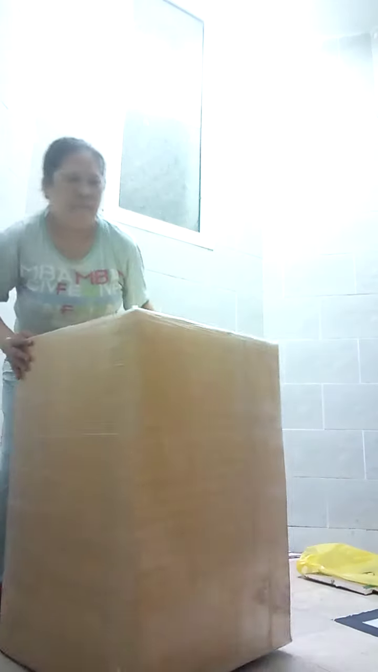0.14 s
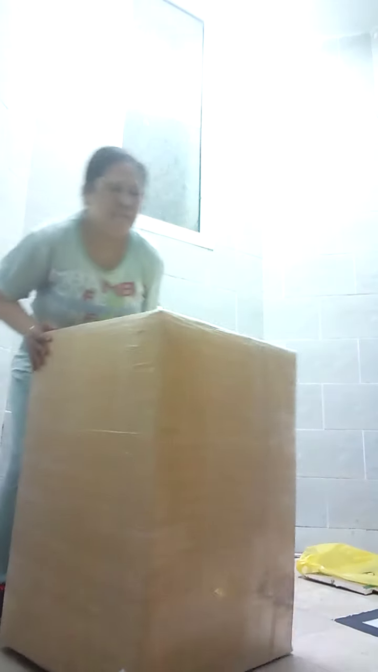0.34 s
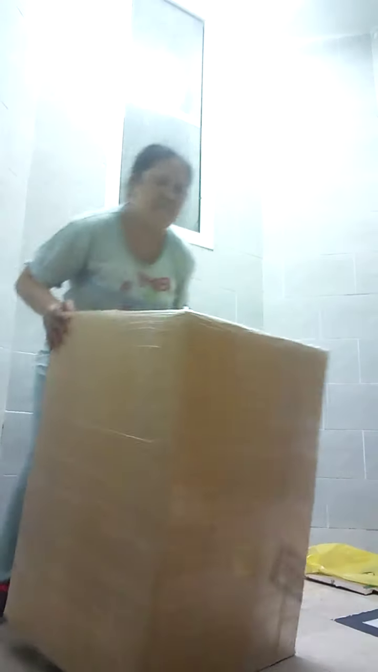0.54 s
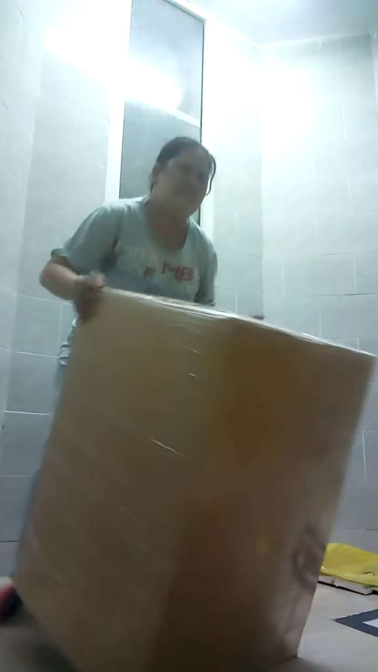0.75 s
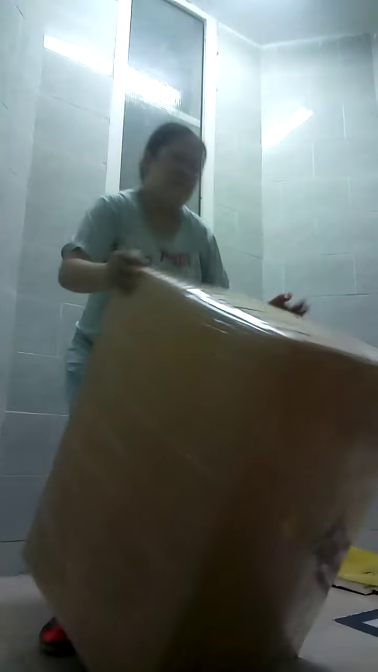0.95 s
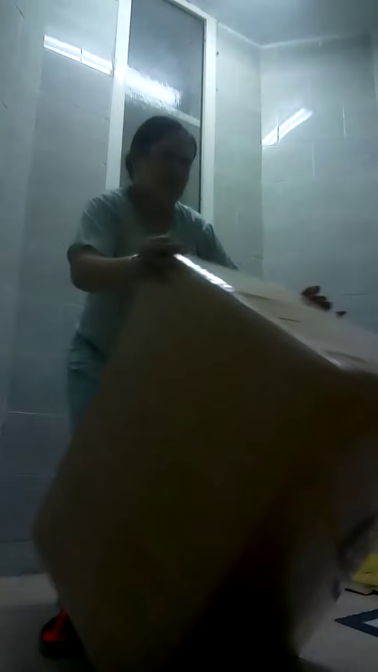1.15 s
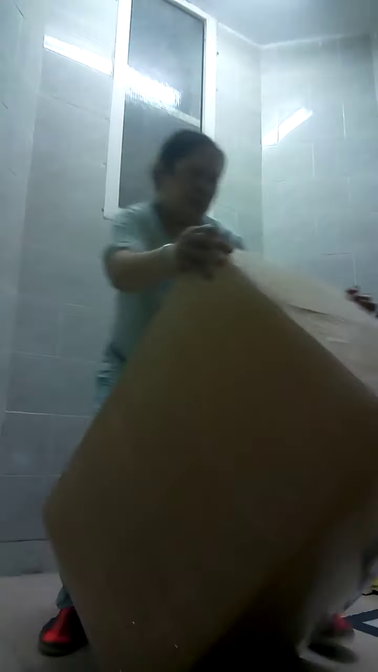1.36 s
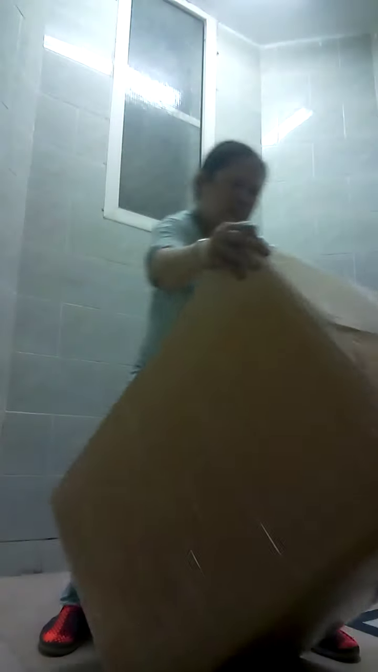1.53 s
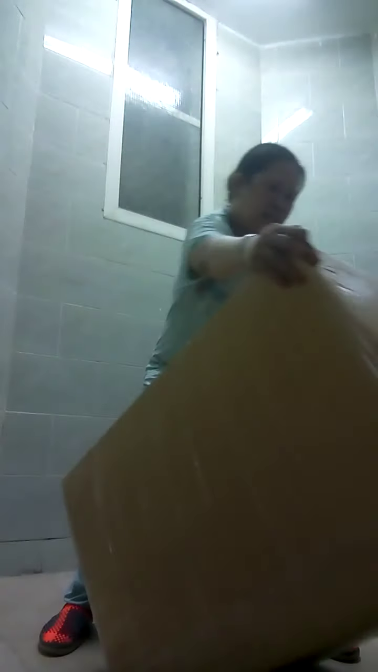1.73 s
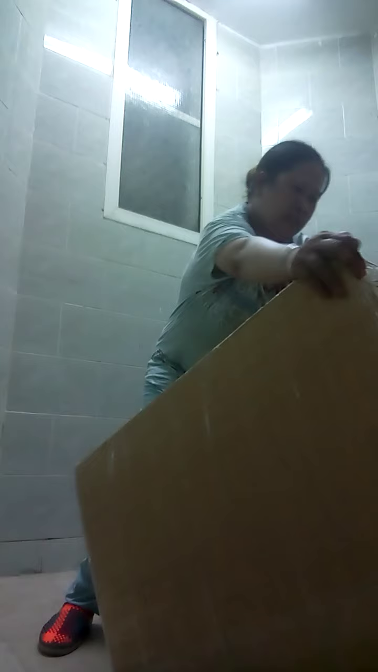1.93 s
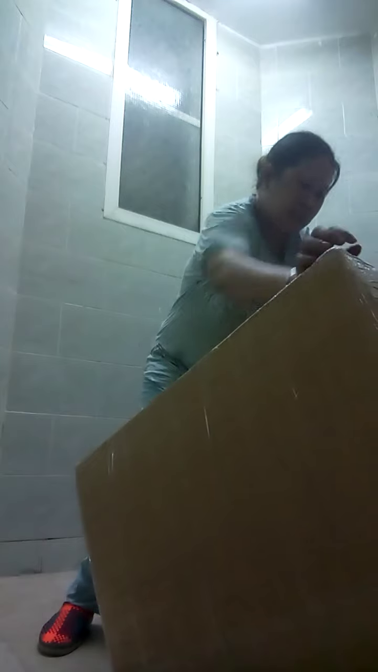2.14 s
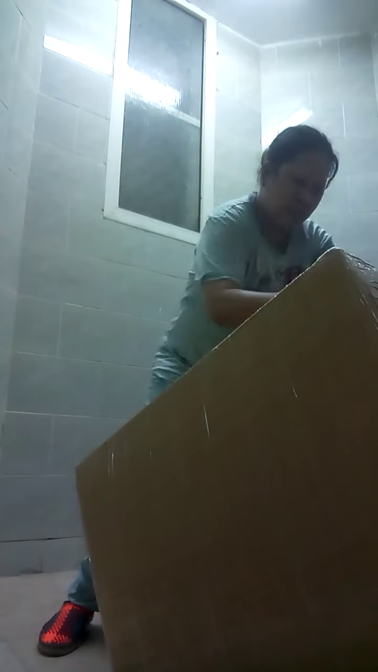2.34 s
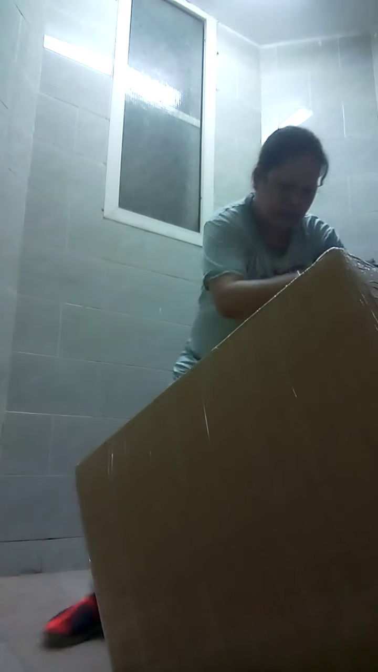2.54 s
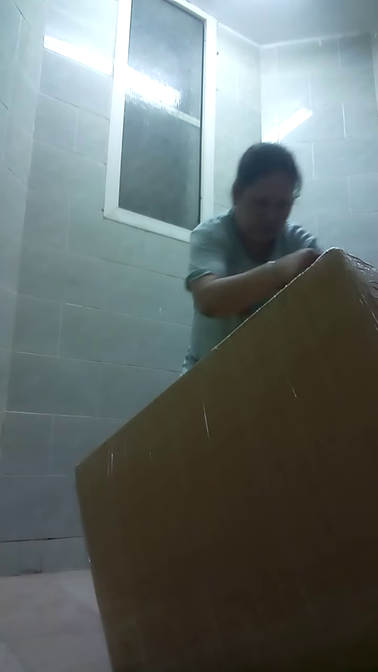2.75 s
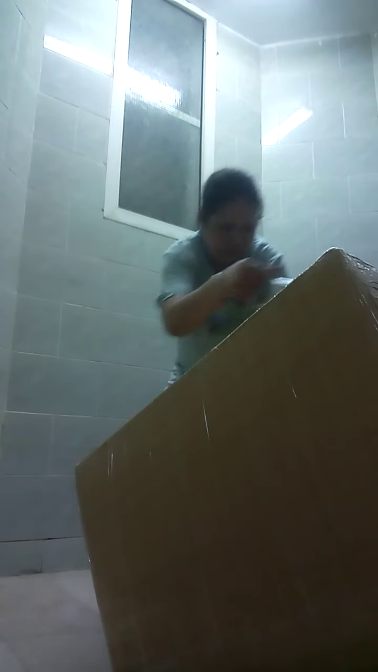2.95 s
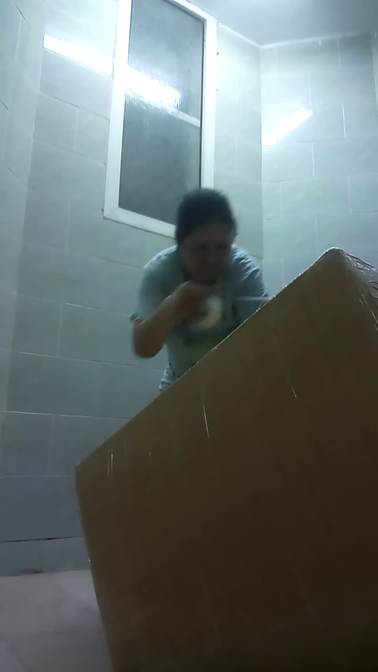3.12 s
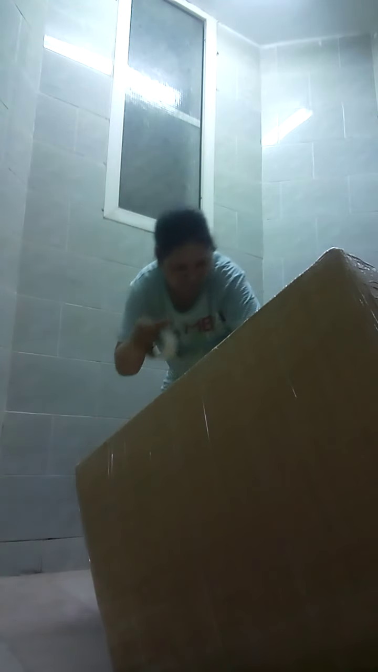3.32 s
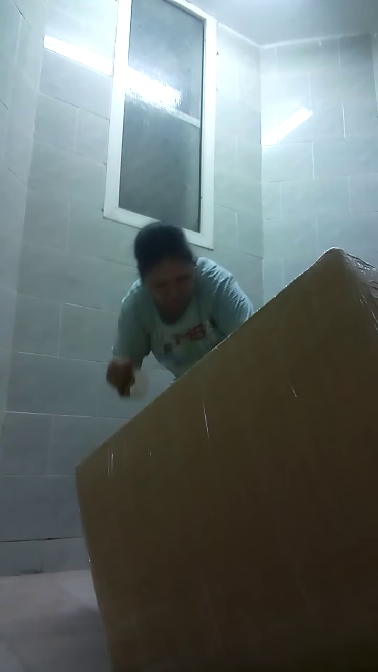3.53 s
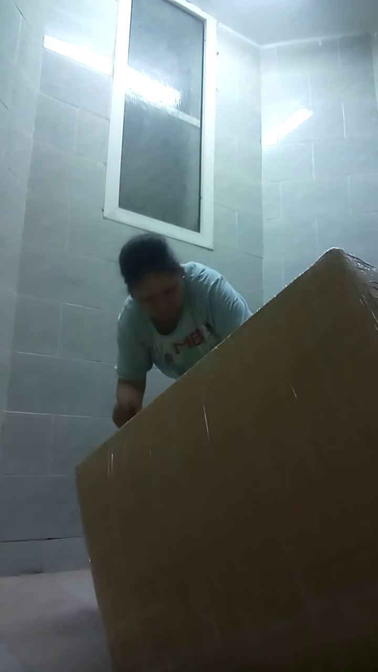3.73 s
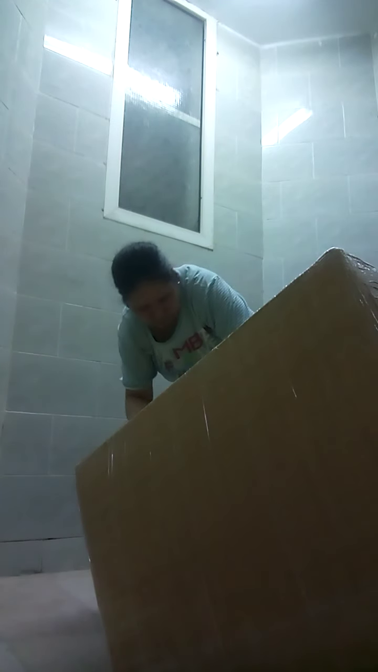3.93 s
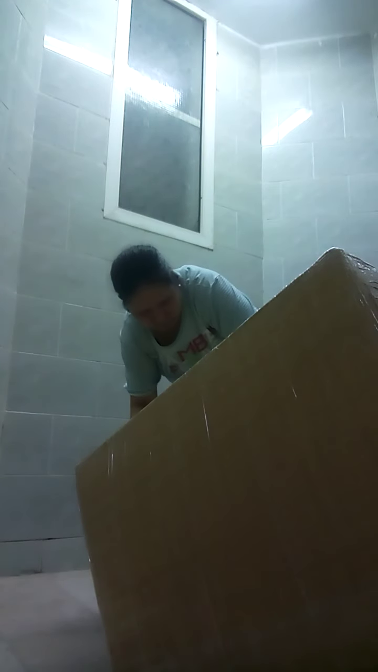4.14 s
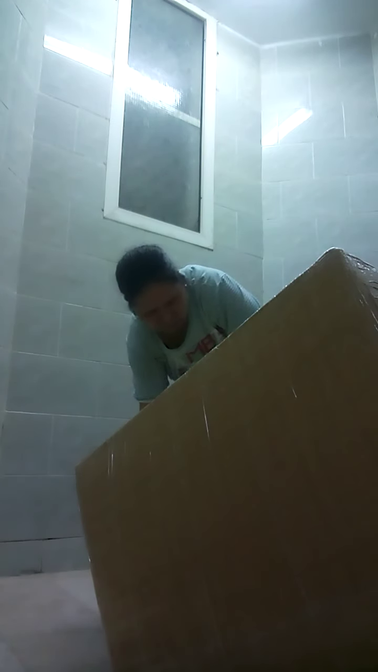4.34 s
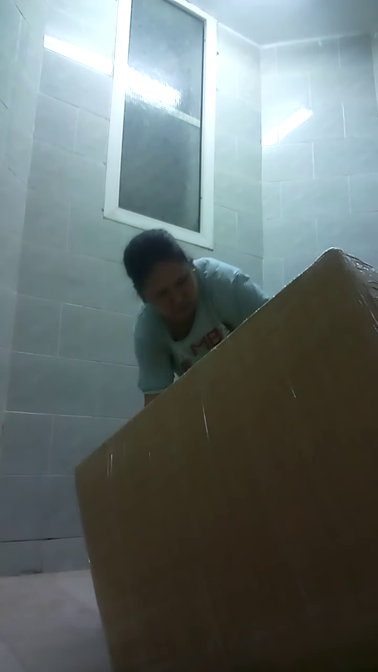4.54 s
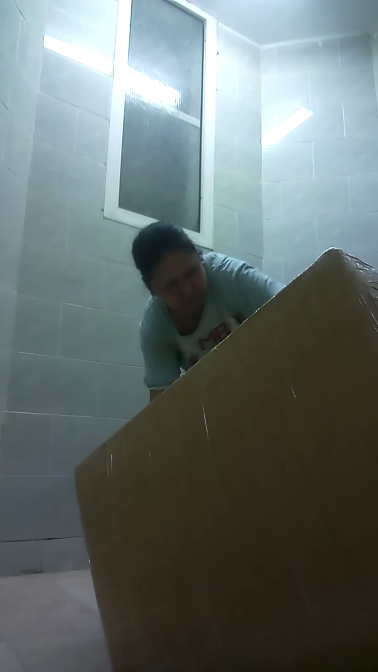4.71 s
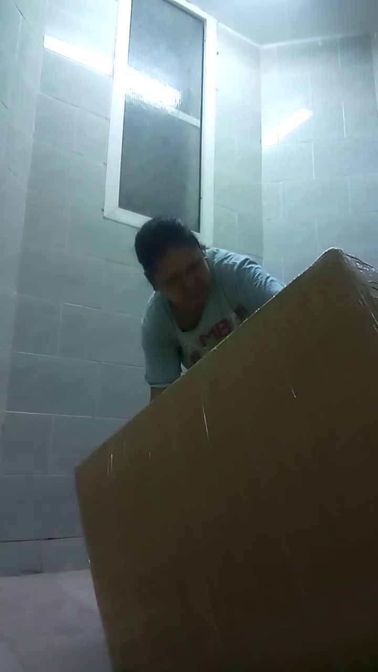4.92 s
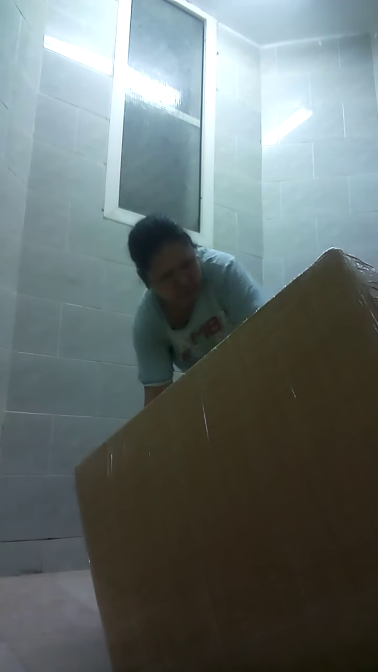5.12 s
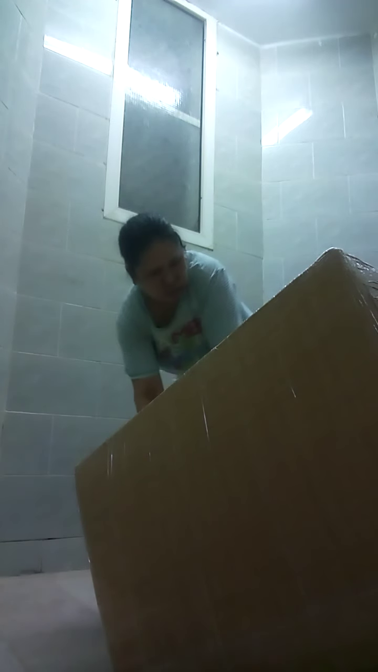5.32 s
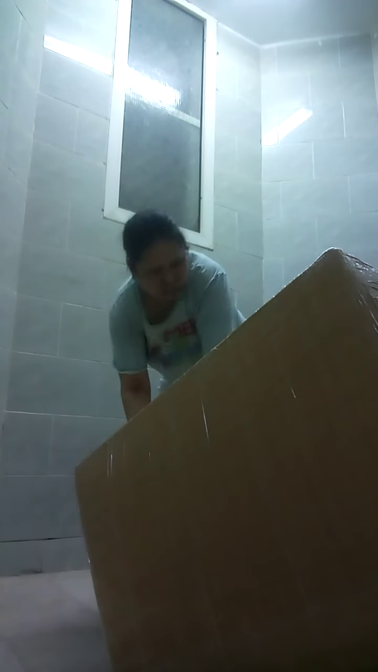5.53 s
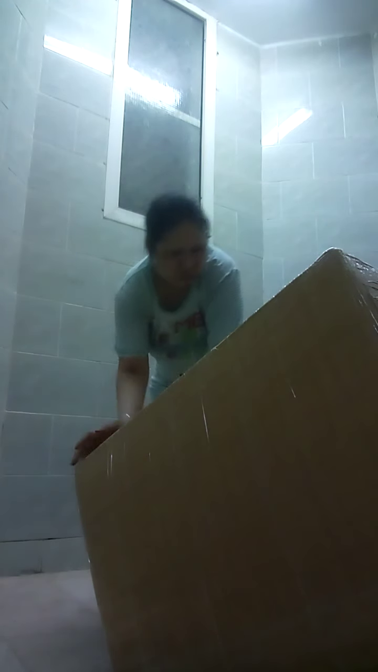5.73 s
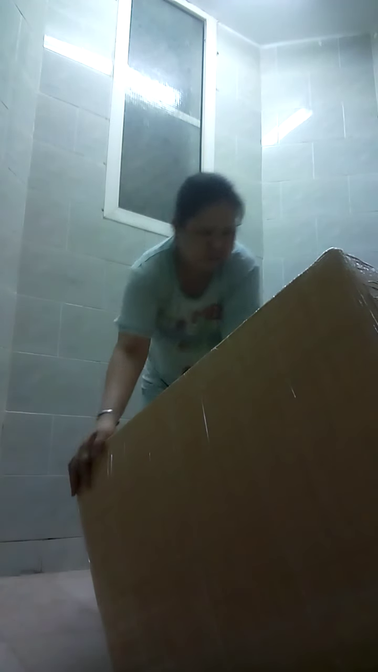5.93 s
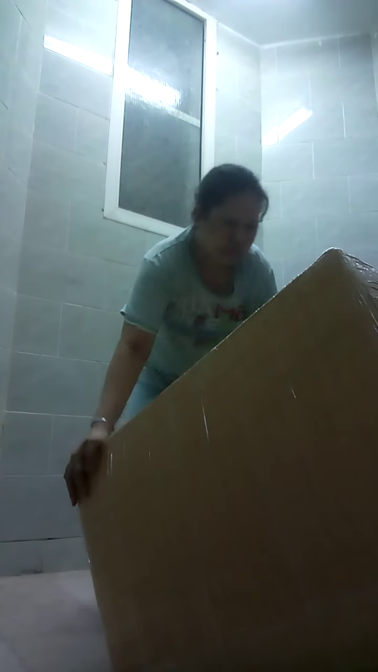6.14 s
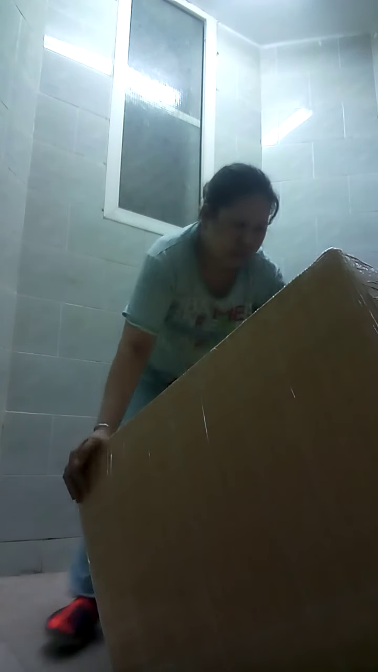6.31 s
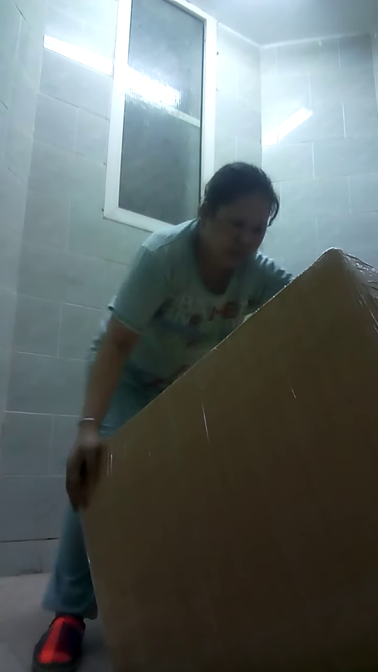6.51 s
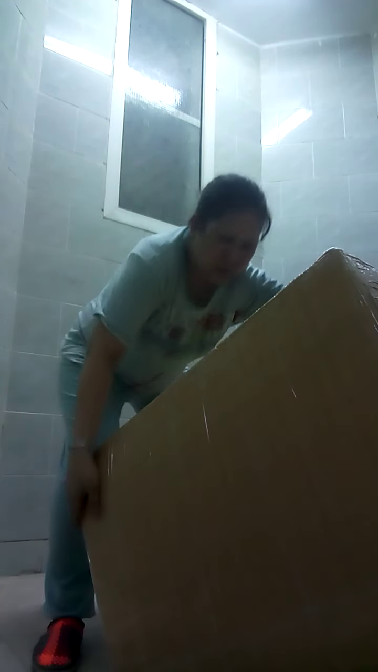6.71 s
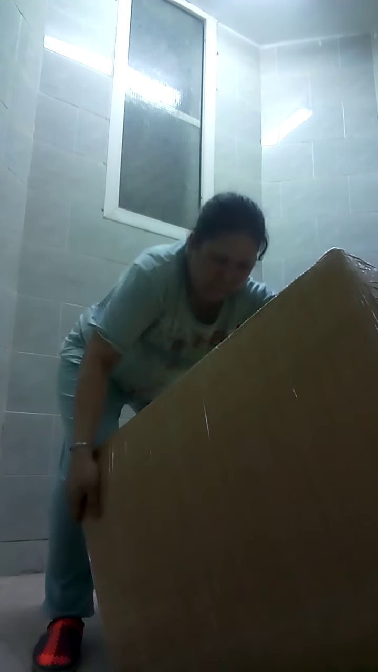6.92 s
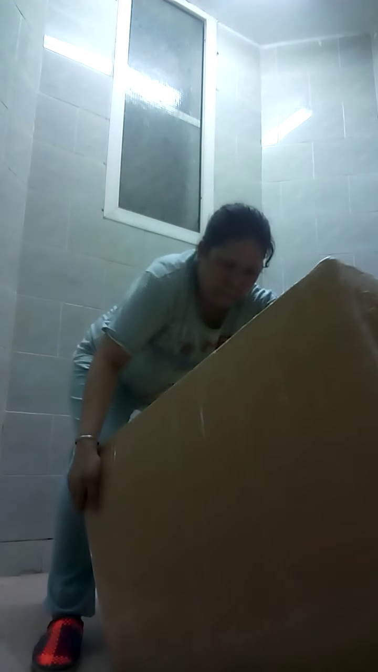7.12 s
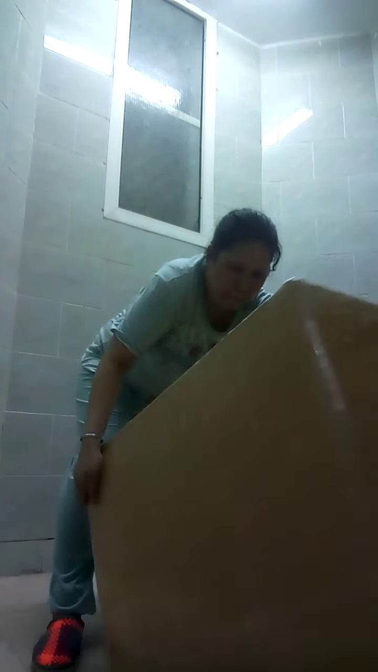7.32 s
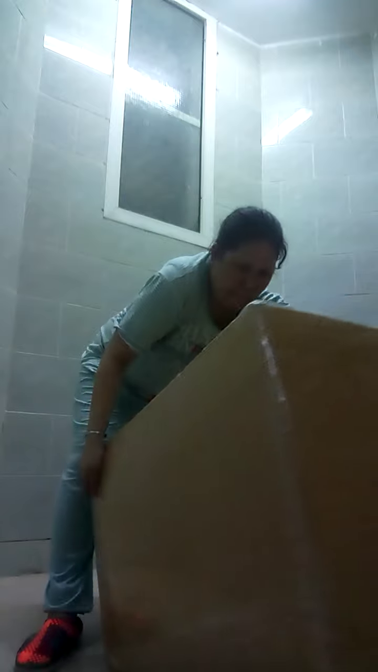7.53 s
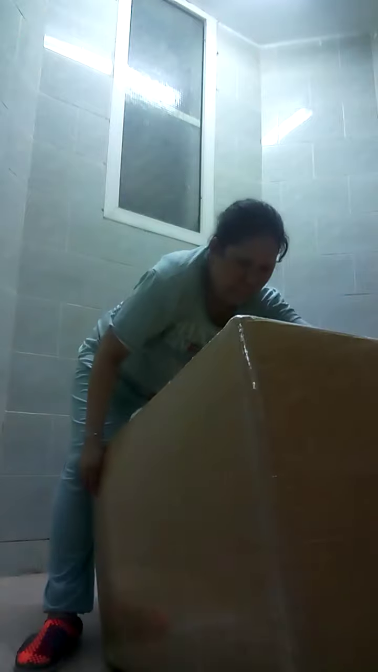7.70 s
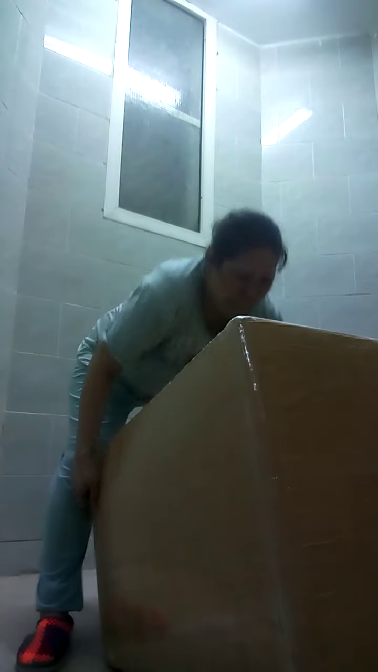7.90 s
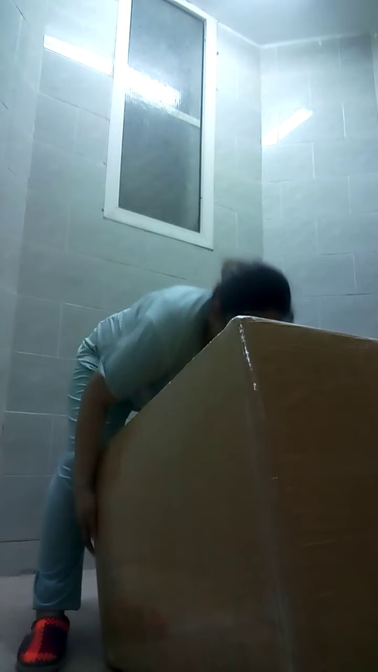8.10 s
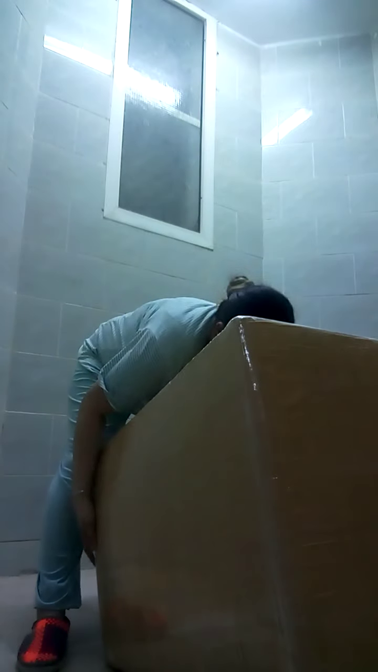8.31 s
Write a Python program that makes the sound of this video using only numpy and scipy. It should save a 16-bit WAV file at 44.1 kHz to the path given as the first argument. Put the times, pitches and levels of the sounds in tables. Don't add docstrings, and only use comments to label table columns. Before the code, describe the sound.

Quiet film rubbing and tiny clicks lead to a boxy thump. Then dense, harsh tape peeling dominates, drumming with a mid-pitched resonance and cracking sharply as the glue lets go; it stops, jerks, and peels again more weakly with a small squeak. Last come plastic rustle, cardboard scraping, low bumps and a few snaps. A motor hums underneath; hard tiles blur everything in a phone's uneven automatic gain.

```python
import sys
import numpy as np
from scipy import signal
from scipy.fft import rfft, irfft, next_fast_len
from scipy.io import wavfile
from scipy.ndimage import uniform_filter1d, map_coordinates

SR = 44100
rng = np.random.default_rng(int(sys.argv[2]) if len(sys.argv) > 2 else 0)


def elevation(decibels):
    levels = np.asarray(decibels, float)
    return 10 ** (levels / 20)


def store_wav(level_fs):
    pcm = np.round(np.clip(np.atleast_2d(level_fs), -1, 1) * 32767)
    wavfile.write(sys.argv[1], SR, pcm.T.astype(np.int16))


N = 373086

# time in seconds, peel level in dB, tension of the free span in dB,
# pitch of the span in Hz, peel speed from 0 to 1.
PULLS = [
    [(2.467, -22, -13.5, 644, 0.2), (2.495, -26, -4.5, 705, .02), (2.54, -28, -2, 805, 0.52),
     (2.96, -26.5, -2.5, 665, 0.52), (3.12, -28.5, -3, 485, 0.6), (3.5, -31, -1, 780, 0.75),
     (3.66, -28.5, -4.5, 790, 0.52), (3.69, -32, -6.5, 760, 0.6), (3.77, -29.5, -4, 710, 0.5)],
    [(3.78, -41, -4, 680, 0), (3.85, -35.5, -2, 660, .02), (4.02, -50, 3, 725, 0.1)],
    [(4.031, -41, -6, 754, 0.5), (4.036, -31.5, -13, 750, 0.97), (4.161, -31.5, -12, 684, 0.66),
     (4.191, -33.5, -4.5, 734, 0.75), (4.301, -34.5, -5.5, 870, 0), (4.455, -42, -3, 790, 0.57),
     (4.699, -58, -0.5, 750, .35), (4.75, -51, -7.5, 763, 0.7), (4.89, -69, 1, 760, 0.5)],
]
# frequency in Hz, level in dB.
FIZZ = [(7500, -52), (9300, -3), (12000, 2.5), (16000, 3.5)]


def tape():
    # frequency in Hz, level in dB.
    slow_peel = [(2800, -41), (4400, -3), (5500, 2), (7000, 0.5), (9000, -6), (12000, -45)]
    fast_peel = [(3500, -40), (5000, -37), (6200, -6), (7500, 4), (9200, 5.5), (11000, -60)]
    scratch = [(750, -23), (1100, 3.5), (1700, 6.5), (2800, 1), (4400, -3), (6200, -44)]
    peel_db, tension_db, span_hz, speed = curves(PULLS)
    slip_db = slips()

    falling = np.clip(-np.gradient(uniform_filter1d(peel_db, size=SR // 20)) * SR - 35, 0, 70)
    fizz_db = 1 + 0.35 * tension_db - 5.5 * speed - 0.1 * falling
    span_db = peel_db - 9 + 1.33 * tension_db

    speed = np.clip(speed, 0, 1)
    bonds = crackle(per_s=740, spread_db=4.5, share=0.11, patchy_db=0.93)
    slow = layer(bonds, slow_peel)
    fast = layer(np.roll(bonds, SR, axis=1), fast_peel)
    hiss = np.sqrt(1 - speed ** 2) * slow + speed * fast
    hiss = hiss + elevation(tension_db) * layer(bonds, scratch)
    hiss = hiss + elevation(fizz_db + 0.48 * slip_db) * layer(bonds, FIZZ)

    centres_hz = np.array([450, 630, 810])
    weights = np.exp(-(np.log(span_hz / centres_hz[:, None]) / 0.37) ** 2) + 0.024
    weights /= np.linalg.norm(weights, axis=0)
    drum = 0
    for c, weight in zip(centres_hz, weights):
        resonance = [(0.35 * c, -36), (0.63 * c, -9), (c, 0), (1.4 * c, -9), (2.0 * c, -30)]
        drum = drum + weight * layer(bonds, resonance)

    hiss_gain = elevation(peel_db + slip_db + 0.39 * wobble(30) + 0.41 * wobble(140))
    drum_gain = elevation(span_db + 0.088 * wobble(28))
    return pulling() * (hiss_gain * hiss + drum_gain * drum)


def slips():
    # time of the peak in seconds, lift in dB.
    releases = [(2.4834, 4), (2.851, 3), (2.902, 3), (3.228, 2.5), (3.256, -1), (3.276, 0), (3.303, 3),
                (3.3315, 7), (3.3425, 5.5), (3.347, 3), (3.375, 5), (3.3803, 4), (3.3946, 4.5), (3.4121, 8),
                (3.468, 10), (3.473, 7), (3.478, 4), (3.537, 4), (3.558, 1.5), (3.595, 4), (3.635, 0),
                (3.698, 2), (3.7466, 1), (3.835, 3), (4.07, 1), (4.11, 3), (4.152, 4), (4.166, 4),
                (4.173, 3), (4.178, 3), (4.186, 2), (4.196, 6), (4.219, 2), (4.238, 7), (4.254, 2),
                (4.2728, 4), (4.287, 4), (4.316, 3.5), (4.474, 2)]
    slip_s, stick_s, stick_share = 0.002, 0.011, 0.28
    gain_db, t = np.zeros(N), np.arange(-SR // 30, SR // 30) / SR
    burst = (1 + stick_share) * np.exp(-(t / slip_s) ** 2)
    shape = burst - stick_share * np.exp(-(t / stick_s) ** 2)
    for s, db in releases:
        gain_db[round(s * SR) - SR // 30:][:len(t)] += db * shape
    return gain_db


def pulling():
    span_s = (2.466, 4.89)
    return (np.arange(N) >= span_s[0] * SR) & (np.arange(N) < span_s[1] * SR)


def snaps():
    # time in seconds, peak in dB,
    # pitch in Hz, breadth as relative level of edge and tap in dB, relative afterglow in dB.
    glue_snaps = [(3.3533, -10, 7020, -8, -18), (3.366, -5, 6540, -8, -10), (3.4205, -6, 4400, -3, -14),
                  (3.4556, -6, 7000, -5, -6), (3.5742, -4.5, 7440, -18.5, -20),
                  (3.6771, -6.5, 6560, -13, -18), (3.781, -12.5, 6500, 3, 6), (4.0299, -10.5, 7600, -21, 1),
                  (4.0505, -8, 7500, -13, -3), (4.128, -11.5, 7300, -21, -11), (4.147, -11, 8100, -11, 9)]
    film_ticks = [(0.4224, -30, 5570, -14, -11), (1.043, -40, 3670, -6, 9), (1.258, -35, 6400, -16, -11),
                  (1.3316, -36, 4080, -22, -13), (1.483, -37.5, 4630, -17, -2),
                  (1.684, -34, 5200, -12, -12), (1.7469, -37, 7550, -24, -7),
                  (1.8346, -17.5, 6300, -37, -10), (1.8895, -23, 4100, -32, -22),
                  (1.974, -18.5, 6560, -13.5, -18), (1.992, -20, 6650, -6, -20),
                  (2.2808, -25, 6630, -9, -0.5), (2.426, -23.5, 6170, -28, 0), (4.723, -27, 8800, -16, 3),
                  (5.204, -27, 9500, -8, -3), (5.703, -20, 6200, -7, 2), (5.719, -20, 6640, -6, -2),
                  (7.2362, -15, 7440, -9, 4.5), (7.5115, -18, 7050, -13, 8.5), (8.0644, -33, 6200, -15, -5),
                  (8.195, -28, 7440, -6.5, -2), (8.2432, -35, 6130, -13, -7)]
    left_shade_db = -5
    dry, glow, t = np.zeros((2, N + SR)), np.zeros(N + SR), np.arange(SR // 25) / SR
    rise = 1 - np.exp(-t / 0.00056)
    for s, db, hz, breadth_db, glow_db in glue_snaps + film_ticks:
        noise = rng.standard_normal((3, 2, len(t)))
        band_hz = [0.85 * hz, min(1.03 * hz, 16000)]
        body = signal.lfilter(*signal.butter(1, band_hz, "band", fs=SR), noise[0])
        edge = signal.lfilter(*signal.butter(2, 10000, "high", fs=SR), noise[1])
        tap = signal.lfilter(*signal.butter(1, [450, 2500], "band", fs=SR), noise[2])
        crack = rise * (body + elevation(breadth_db + 10) * edge + elevation(breadth_db - 5.5) * tap)
        life_s = 0.015 * elevation(0.11 * (db + 4.0))
        fade = elevation(-60 * t / life_s) + elevation(glow_db + 3.5 - 60 * t / 0.032)
        crack *= elevation(db) / np.abs(crack * fade).max(axis=1, keepdims=True)
        start = round(s * SR)
        dry[:, start:][:, :len(t)] += crack * fade
        glow[start:][:len(t)] += elevation(glow_db) * crack[0] * fade
    direct = dry[:, :N] * elevation([[left_shade_db], [0]])
    return heard(direct + room(glow[:N]), np.ones_like)


def handling():
    # time of the peak in seconds, peak in dB, rise and fall over 20 dB
    # in ms, relative level of the card scrape in dB.
    tipping = [
        (0.0, -43, 10, 270, -5),
        (0.474, -49.5, 2400, 670, -7),
        (0.822, -48, 62, 500, -2.5),
        (1.332, -59.5, 250, 390, -7),
        (1.564, -62, 810, 1000, -19),
        (1.75, -52.5, 10, 430, -10),
        (1.844, -38, 11, 345, -6.5),
        (2.29, -61, 62, 600, -18),
        (2.426, -48.5, 11, 66, 4),
        (2.459, -42.5, 99, 100, -19),
    ]
    shifting = [(5.06, -49.5, 210, 500, -17), (5.257, -46, 480, 470, -10.5), (5.484, -46, 57, 600, -12.5),
                (5.705, -49, 8, 200, -13), (5.89, -48, 14, 600, -20), (6.053, -46.5, 390, 169, -16.5),
                (6.17, -60.5, 30, 120, -0.5), (6.42, -59, 100, 300, -13), (6.58, -50.5, 190, 306, -12.5),
                (6.903, -51.5, 1000, 700, -13), (7.2, -45.5, 460, 300, -16), (7.24, -41, 53, 700, -15),
                (7.53, -37, 720, 390, -11.5), (8.02, -54, 1000, 172, -6.5), (8.25, -57, 41, 201, -2),
                (8.46, -58, 620, 101, -19)]
    # time of the peak in seconds, peak in dB, rise and fall in ms.
    pushes = [(0.0, -66, 10, 110), (0.572, -53.5, 1300, 200), (0.806, -48.5, 180, 130),
              (1.29, -55.5, 550, 380), (1.574, -57.5, 60, 590), (1.83, -32, 5.6, 54), (1.9, -40, 50, 190),
              (2.53, -42, 88, 160), (3.13, -40.5, 820, 420), (3.44, -39, 560, 100), (3.46, -31.5, 24, 17),
              (3.53, -41.5, 55, 500), (3.92, -50.5, 500, 73), (4.27, -47.5, 270, 860),
              (4.62, -60, 500, 270), (5.34, -51, 920, 200), (5.49, -62, 240, 530), (6.0, -60.5, 1400, 730),
              (6.43, -51.5, 60, 100), (7.0, -52.5, 86, 500), (7.15, -40.5, 78, 210), (7.3, -45, 350, 630),
              (7.47, -43, 330, 170), (7.79, -53, 140, 350), (8.46, -65, 130, 130)]
    # frequency in Hz, level in dB.
    rustle = [(2100, -19.5), (3400, -2), (4500, -1.5), (6000, -1.5), (8500, -1), (11000, -12)]
    scrape = [(380, -8), (600, -2.5), (900, -3), (1500, 5.5), (2600, 3), (5000, -40)]
    rumble = [(90, -17), (150, 0), (250, -1.5), (350, -4.5), (480, -5), (750, -21)]
    rest_db, rest_fizz_db, rest_walls_db = -71, -74, -66
    strokes = np.array(tipping + shifting)
    friction = crackle(per_s=250, spread_db=2.5, share=0.08, patchy_db=1.2)
    film = swells(strokes, rest_db) * layer(friction, rustle)
    film = film + swells(strokes, rest_db, strokes[:, -1:]) * layer(friction, scrape)
    film = film + swells(strokes, rest_fizz_db, extra_db=-9, sooner=0.77) * layer(friction, FIZZ)
    walls = layer(crackle(per_s=140, spread_db=1.5, share=0.27, patchy_db=1.0), rumble)
    return ~pulling() * elevation(1.5 * wobble(17)) * film + swells(pushes, rest_walls_db) * walls


def pricks():
    # time in seconds, peak in dB, relative level of the lower part in
    # dB.
    sharp_clicks = [(0.2369, -32, -12), (0.2798, -33, -14), (0.4449, -33, -11), (0.6499, -30, -8),
                    (0.9732, -36, 2), (1.1867, -41, -14), (1.292, -44, -7), (1.5793, -43, -11),
                    (1.7649, -41, -8), (1.7784, -31, -10), (2.0818, -39, -11), (2.1929, -41, -16),
                    (2.3496, -36, -12), (4.7087, -40, -3), (5.6885, -36, 1), (5.7544, -36, 3),
                    (6.1659, -40, 4), (6.1734, -55, 1), (6.3011, -42, -12), (6.3974, -41, -4),
                    (6.4737, -47, -4), (6.5141, -42, -7), (6.7296, -49, -8), (7.6944, -37, 9),
                    (7.7747, -31.5, -11), (7.889, -46, -15), (7.9144, -41, -7), (7.9399, -32, -11),
                    (8.0471, -36, -7), (8.1763, -41, -10), (8.4193, -39, -3),
                    (1.043, -42, 7),
        (1.2585, -35, -2),
        (1.7895, -41, -2),
        (3.4553, -9, 3),
        (3.4583, -11, -1),
        (3.7815, -14, -6),
        (7.213, -11.5, -5),
        (8.1953, -30, -16),
    ]
    left_shade_db = -5
    dry, t = np.zeros((2, N + SR)), np.arange(SR // 100) / SR
    envelope = elevation(-60 * t / 0.0055) * (1 - np.exp(-t / 0.0003))
    for s, db, low_db in sharp_clicks:
        noise = rng.standard_normal((2, 2, len(t))) * envelope
        airy = signal.lfilter(*signal.butter(2, 8500, "high", fs=SR), noise[0])
        low = signal.lfilter(*signal.butter(2, [3600, 8400], "band", fs=SR), noise[1])
        airy /= np.abs(airy).max(axis=1, keepdims=True)
        low /= np.abs(low).max(axis=1, keepdims=True)
        click = airy + elevation(low_db - 6) * low
        dry[:, round(s * SR):][:, :len(t)] += elevation(db + 4.7) * click
    return heard(dry[:, :N] * elevation([[left_shade_db], [0]]), np.ones_like)


def knocks():
    # time in seconds, peak in dB.
    drop = [
        (1.819, -11.5),
        (1.827, -24.5),
        (3.4548, -27),
    ]
    # frequency in Hz, level in dB, 60 dB decay time in seconds.
    box_modes = [(133, 7.5, 0.086), (215, 6.5, 0.036), (321, 1.5, 0.08), (412, -4.5, 0.046),
                 (1330, -10, 0.039), (710, -6.5, 0.054), (882, -12.5, 0.057)]
    # time in seconds, pitch in Hz, level in dB, length in seconds.
    creaks = [(0.755, 391, -48, 0.028), (.82, 452, -46, 0.022), (1.573, 342, -43, 0.011),
              (4.173, 668, -29.5, 0.02), (4.198, 890, -44, 0.058), (4.227, 1065, -30, 0.1),
              (4.236, 1150, -30, 0.052), (6.406, 249, -50.5, 0.054), (6.976, 328, -47.5, 0.063),
              (7.125, 164, -39, 0.035), (7.17, 190, -46, 0.03), (7.236, 322, -38, 0.024),
              (7.416, 250, -44, 0.016), (7.458, 393, -33.5, 0.015)]
    out, t = np.zeros(N + SR), np.arange(SR // 2) / SR
    ring = sum(elevation(db - 60 * t / t60) * np.sin(2 * np.pi * hz * t) for hz, db, t60 in box_modes)
    ring *= 1 - np.exp(-t / 0.00079)
    for s, db in drop:
        out[round(s * SR):][:len(t)] += elevation(db - 13.0) * ring
    for s, hz, db, length in creaks:
        u = t / length
        tone = np.sin(2 * np.pi * hz * t * (1 + 0.033 * u))
        out[round(s * SR):][:len(t)] += elevation(db + 8.0) * u * np.exp(1 - 3 * u) * tone
    return heard(out[:N] + elevation(-1.5) * room(out[:N]), np.ones_like)


def motor():
    # time in seconds, hum level in dB.
    hum_level = [(0.0, -52), (0.52, -50), (0.66, -58), (0.85, -48), (1.23, -55), (1.39, -48.5), (1.74, -54),
                 (2.07, -48.5), (3.39, -51), (4.7, -50.5), (4.79, -47), (4.93, -48), (4.97, -57),
                 (5.25, -49), (5.65, -51.5), (6.7, -51), (7.18, -48.5), (8.46, -54.5)]
    # frequency in Hz, wander (or width) in Hz, level in dB; the last row is the rumble.
    partials = [(78.4, 3.75, 2), (118.8, 2.62, -0.5), (175.6, 4.77, -10), (237, 5.94, -12), (94, 61, 6)]
    duck_from_db, duck_slope = -36, 1.27
    *tones, (centre_hz, width_hz, rumble_db) = partials
    rumble = heard(rng.standard_normal((2, N)), lambda f: 1 / (1 + (2 * (f - centre_hz) / width_hz) ** 2))
    lines = np.zeros(N)
    for hz, wander_hz, db in tones:
        level = elevation(db + 1.3 * wobble(6))
        lines += level * np.sin(2 * np.pi * np.cumsum(hz + wander_hz * wobble(9)) / SR)
    hum = elevation(rumble_db - 16) * rumble / np.std(rumble) + heard(np.array([lines, lines]), np.ones_like)
    power = uniform_filter1d(uniform_filter1d(hum.mean(0) ** 2, size=SR // 10), size=SR // 10)
    swell = np.sqrt(np.abs(power))
    duck_db = pulling() * duck_slope * np.maximum(curves(PULLS)[0] - duck_from_db, 0)
    return elevation(curves([hum_level])[0] - duck_db) * hum / swell


def room(x):
    # frequency in Hz, 60 dB decay time in seconds.
    decay = [(100, 1.1), (700, 0.98), (4000, 1.06), (13000, 0.57)]
    hz, t, z = signal.stft(rng.standard_normal((2, SR)), SR, nperseg=256)
    tail = signal.istft(z * elevation(-60 * t / along(decay, hz)[:, None]), SR, nperseg=256)[1]
    tail /= np.linalg.norm(tail[0])
    return signal.fftconvolve(np.pad(x, (200, 0))[None], tail, axes=1)[:, :N]


def layer(pair, points):
    # frequency in Hz, width in Hz, lift in dB.
    standing = [(466, 6.3, 7), (644, 2.7, 11), (794, 20, 3), (1410, 6.7, 6), (1566, 30, 5.5), (2420, 12, 2),
                (2830, 15, 0), (3800, 11, -9), (4200, 18, 3), (4660, 19, 1), (6520, 670, 3.5)]

    def colour(hz):
        lift_db = np.zeros(len(hz))
        third = len(hz) // 3
        for centre, width, db in standing:
            lift_db[:third] += db / (1 + (2 * (hz[:third] - centre) / width) ** 2)
        return elevation(along(points, hz) + lift_db)

    x = heard(pair, colour)
    return x / np.std(x.mean(0))


def heard(pair, colour):
    # frequency in Hz, level in dB.
    right_mic = [(30, -12), (70, -7.5), (450, 4.5), (820, 6.5), (1150, -9), (1550, -7), (2000, -6),
                 (3500, 2.5), (6600, 4.5), (9000, 3.5), (13600, -4.5), (15000, 7), (15500, 3), (15800, -63)]
    left_mic = [(30, -29), (70, -9), (300, -3), (600, -4), (1200, -5.5), (1900, -10.5), (3000, -4.5),
                (6000, -4.5), (8600, -6), (10000, -14), (13000, -168), (14000, -103), (15000, -101),
                (15800, -70.5)]
    # frequency in Hz, left-right likeness from 0 to 1.
    likeness = [(60, 0.94), (480, 1), (750, 0.69), (950, 0.63), (1200, 1), (1600, 0.21), (2500, 0.15),
                (5000, 0.05)]
    # frequency in Hz, phase by which left leads in radians.
    lead = [(0, 0.5), (90, 0.65), (300, 1.66), (520, 2.92), (750, 3.84), (1000, 7.54), (1150, 10.13),
            (1650, 12.64), (2500, 16.43), (16000, 109)]
    m = next_fast_len(N + SR // 4)
    hz = np.fft.rfftfreq(m, 1 / SR)
    a, b = rfft(pair, m) * colour(hz)
    alike = np.clip(along(likeness, hz), 0, 1)
    delayed = a * np.exp(-1j * np.interp(hz, *np.transpose(lead)))
    right = alike * delayed + np.sqrt(1 - alike ** 2) * b
    return irfft([a * elevation(along(left_mic, hz)), right * elevation(along(right_mic, hz))], m)[:, :N]


def crackle(per_s, spread_db, share, patchy_db):
    size = (rng.random(N) < per_s / SR) * elevation(spread_db * np.minimum(rng.exponential(size=N), 3))
    blur = elevation(-60 * np.arange(SR // 50) / SR / 0.0038)
    grains = np.sqrt(np.abs(signal.fftconvolve(size ** 2, blur ** 2)[:N]))
    grains /= np.sqrt(np.mean(grains ** 2))
    z = signal.stft(rng.standard_normal((2, N)), nperseg=256)[2]
    patches = uniform_filter1d(uniform_filter1d(rng.standard_normal(z.shape[1:]), 8, 0), 10, 1)
    wash = signal.istft(z * elevation(patchy_db * patches / np.std(patches)), nperseg=256)[1][:, :N]
    return wash / np.std(wash) * np.sqrt(1 - share + share * grains ** 2)


def swells(rows, rest_db, extra_db=0, sooner=1):
    s, db, rise_ms, fall_ms = np.transpose(rows)[:4, :, None]
    t = np.arange(0, N + 44, 44) / SR
    shape_db = -20000 * np.where(t < s, (s - t) / rise_ms, (t - s) / (sooner * fall_ms))
    power = (elevation(db + extra_db + shape_db) ** 2).sum(0) + elevation(rest_db) ** 2
    return np.interp(np.arange(N) / SR, t, np.sqrt(power))


def wobble(rate):
    return map_coordinates(rng.standard_normal(int(N * rate / SR) + 4), [np.arange(N) * rate / SR])


def curves(tables):
    t = np.arange(N) / SR
    out = np.zeros((len(tables[0][0]) - 1, N))
    for k, table in enumerate(tables):
        s, *columns = np.transpose(table)
        start = round(s[0] * SR) if k else 0
        out[:, start:] = [np.interp(t[start:], s, column) for column in columns]
    return out


def along(points, hz):
    f, v = np.transpose(points)
    return np.interp(np.log(hz + 1), np.log(f + 1), v)


def scene():
    return tape() + handling() + snaps() + knocks() + motor() + pricks()


def low_pass(x):
    return signal.sosfilt(signal.butter(12, 16810, fs=SR, output="sos"), x)


def record(dry):
    # time of the jump in seconds, depth of the dip in dB.
    dips = [(1.256, 12), (2.283, 6), (2.426, 4), (2.469, 9), (3.454, 0), (3.575, -1), (3.677, 4),
            (3.779, 14), (4.028, 9), (4.128, 12), (5.703, 0), (7.211, 3), (7.236, -1), (8.195, 1)]
    dip_db, ramp = np.zeros(N), np.linspace(0, 1, SR // 70)
    for s, depth_db in dips:
        jump = round(s * SR)
        dip_db[jump - len(ramp):jump] -= abs(depth_db) * ramp
    x = dry * elevation(uniform_filter1d(dip_db, size=SR // 500))
    ceiling = 0.62
    mix = x / (1 + np.abs(x / ceiling) ** 4) ** (1 / 4)
    return low_pass(mix)


dry = scene()
out = record(dry)
store_wav(out)
```